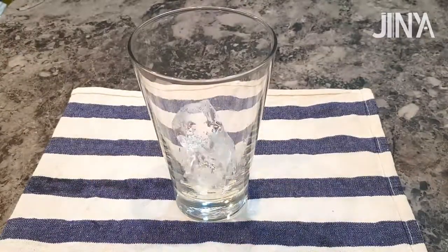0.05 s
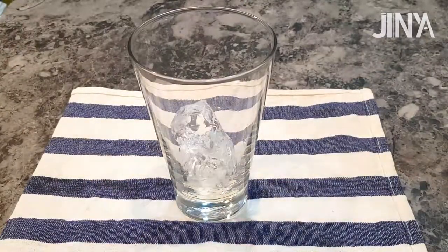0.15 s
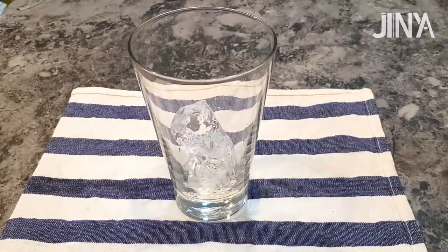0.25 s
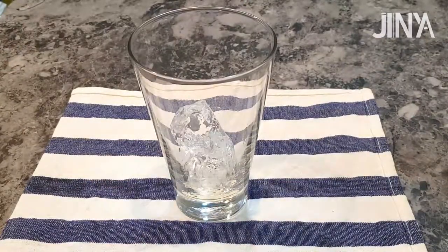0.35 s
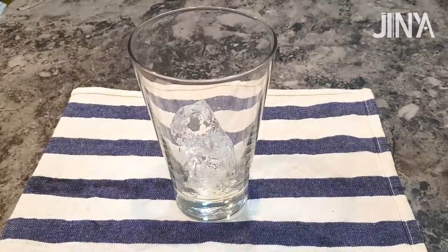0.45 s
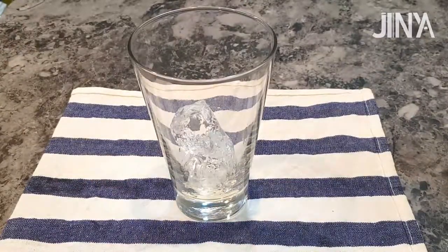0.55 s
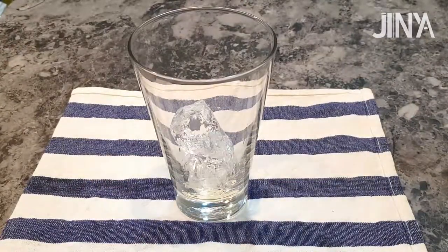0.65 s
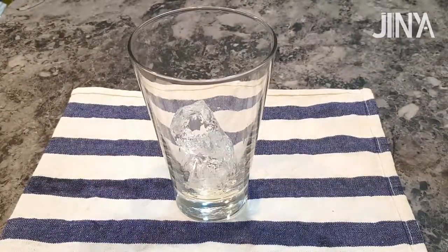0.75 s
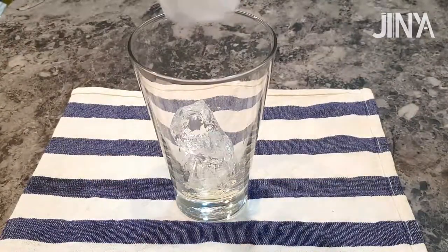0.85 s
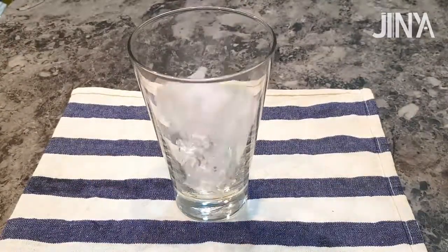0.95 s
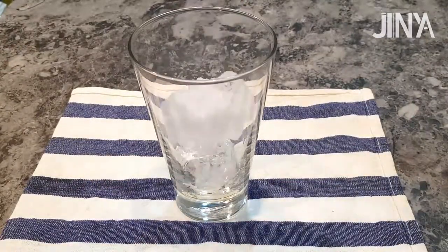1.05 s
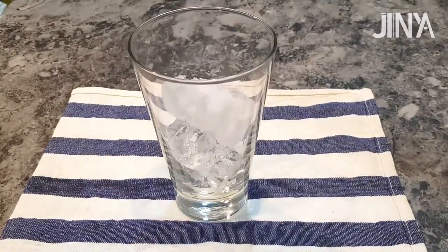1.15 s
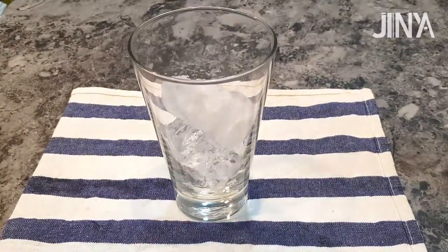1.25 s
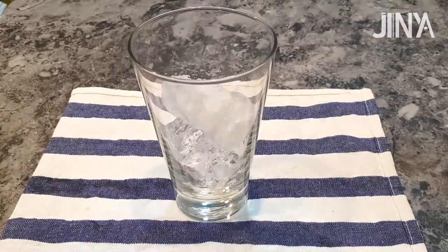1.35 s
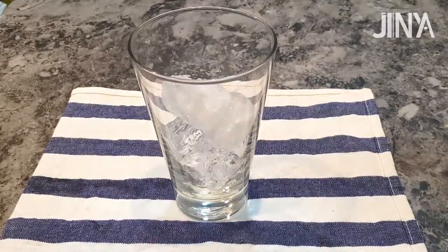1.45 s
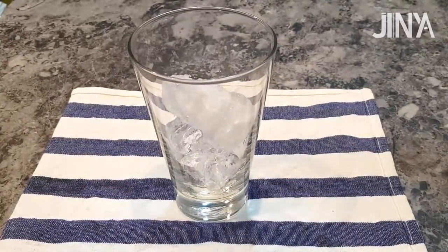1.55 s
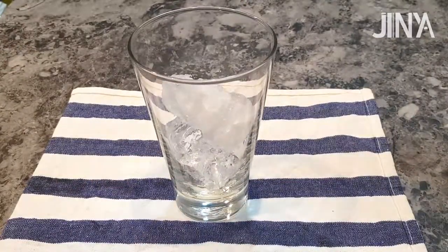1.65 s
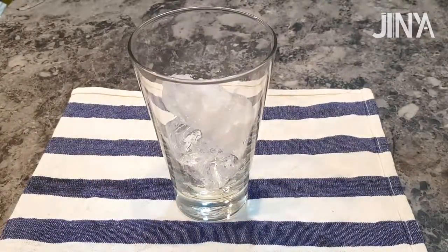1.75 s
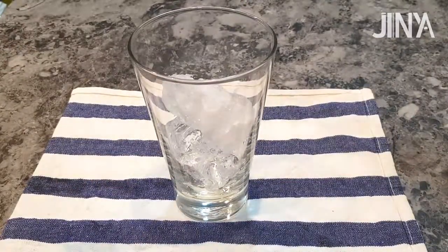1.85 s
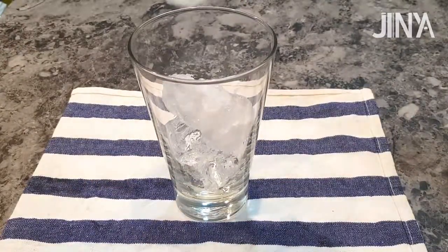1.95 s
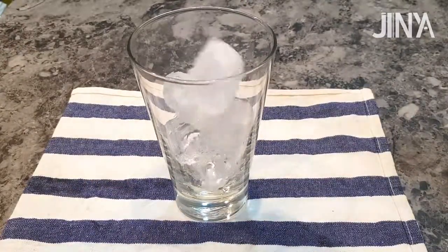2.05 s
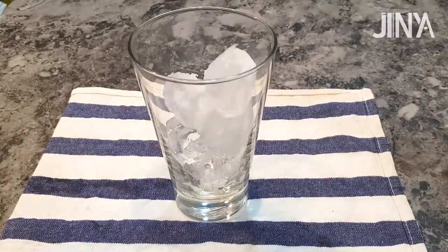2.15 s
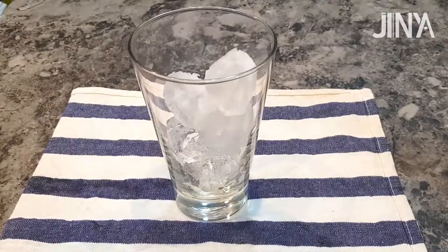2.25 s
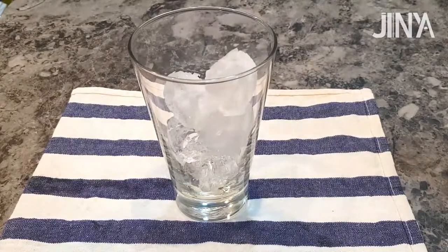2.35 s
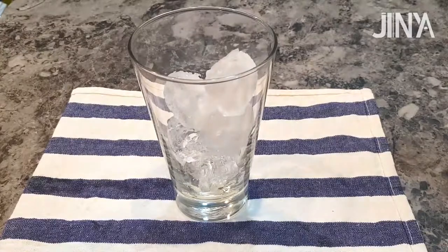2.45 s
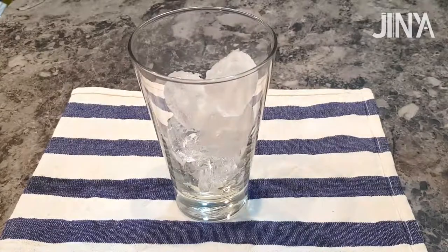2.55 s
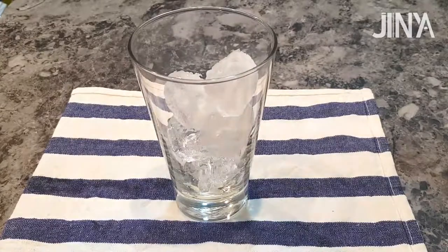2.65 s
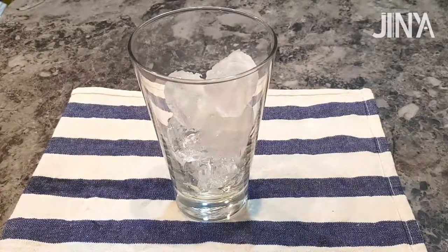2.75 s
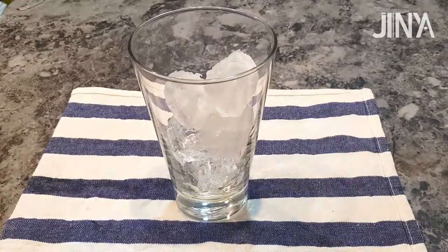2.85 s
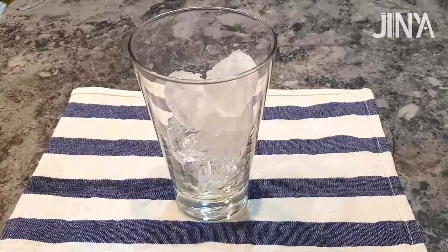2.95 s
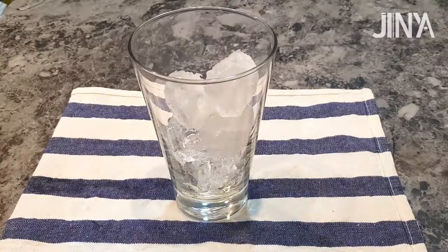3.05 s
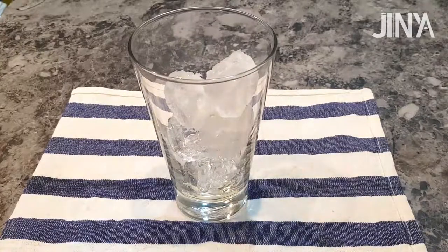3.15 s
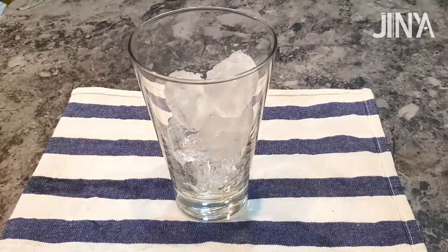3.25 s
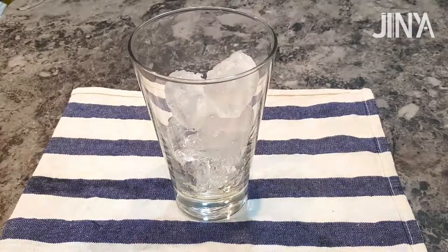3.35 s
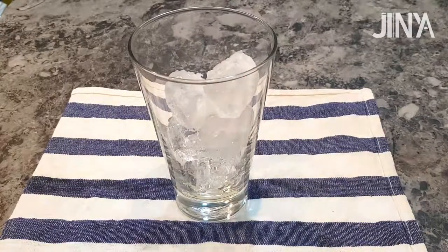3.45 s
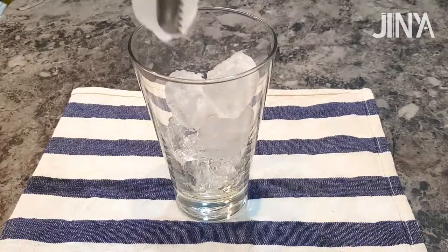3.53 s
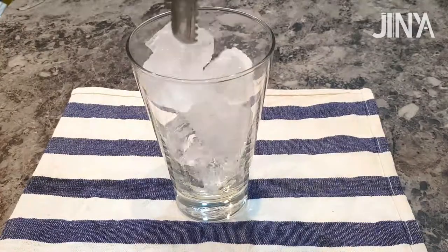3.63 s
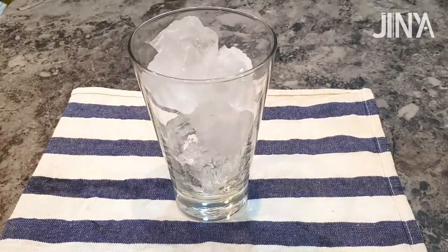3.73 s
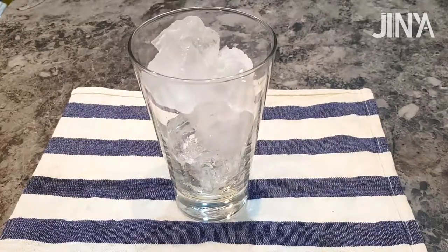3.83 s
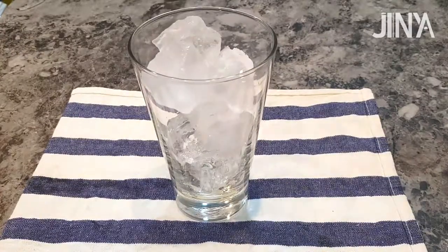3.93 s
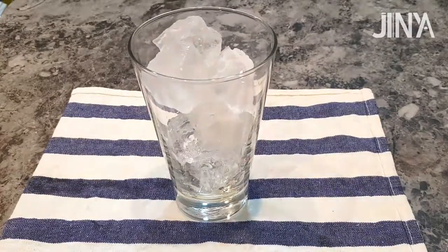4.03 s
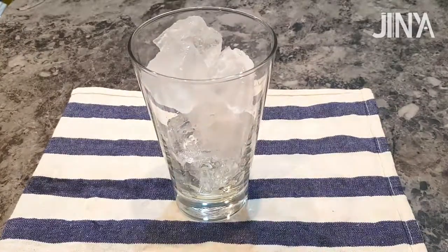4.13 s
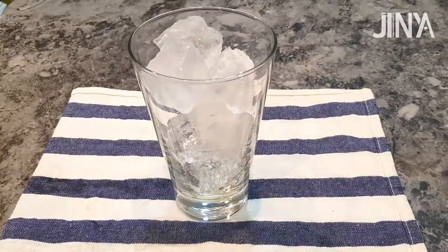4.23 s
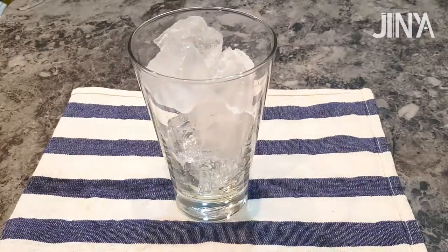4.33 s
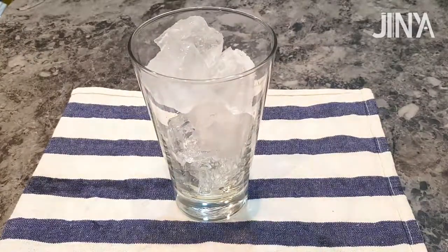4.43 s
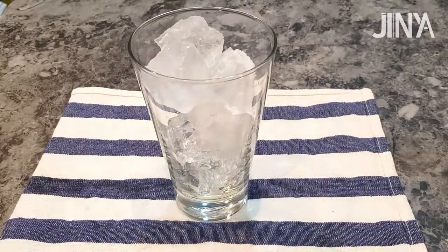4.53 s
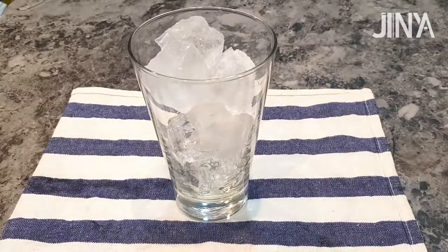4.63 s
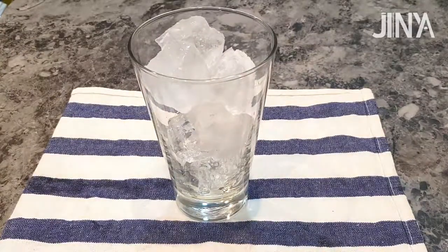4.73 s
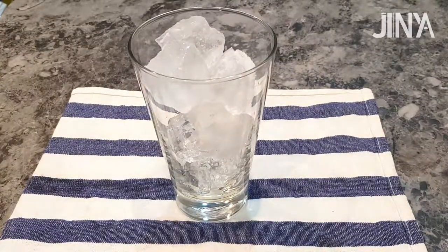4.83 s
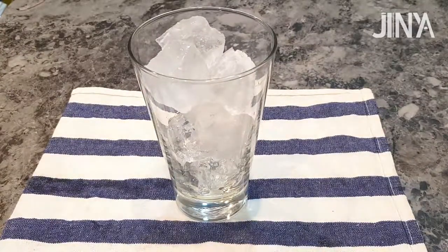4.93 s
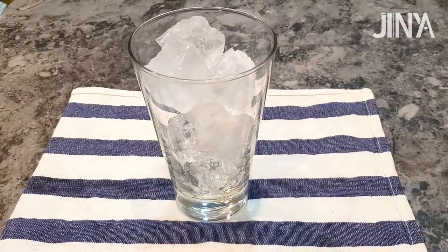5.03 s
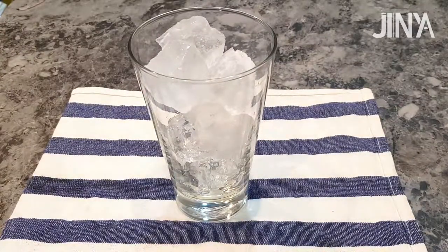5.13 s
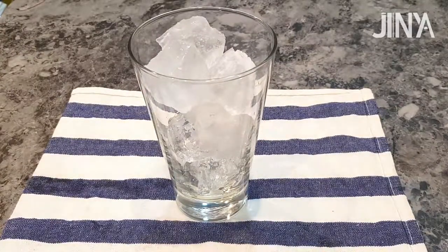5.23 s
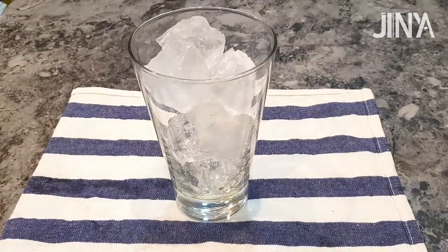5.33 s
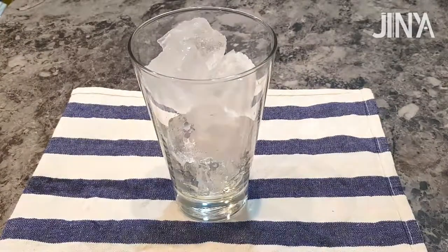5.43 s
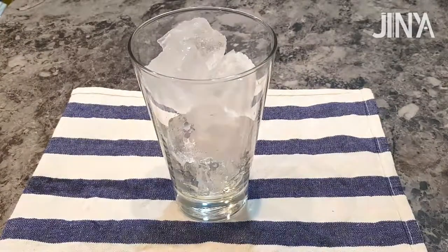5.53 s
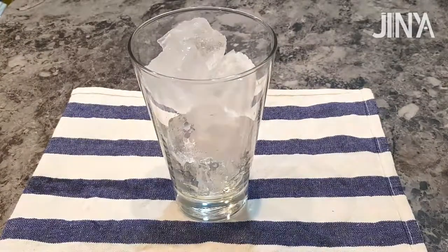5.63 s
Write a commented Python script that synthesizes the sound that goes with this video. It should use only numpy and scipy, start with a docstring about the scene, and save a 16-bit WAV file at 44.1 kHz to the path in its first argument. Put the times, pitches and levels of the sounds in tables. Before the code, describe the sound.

Four ice cubes drop one by one into a tall glass, clinking brightly, while loose cubes clack and slide in a bowl between drops.

```python
"""Four ice cubes drop one after another into a tall glass close by: wall modes ring, the pile knocks, ice cracks.
Between the drops, loose cubes clack, tumble and slide in a bowl farther off to the left, as the next is picked out.
Contacts are noise bursts coloured by resonances; ringing is decaying sines; slides are grainy, swelling hiss.
An appliance hums in the small kitchen; two spaced microphones listen above a cloth-covered counter."""
import sys
import numpy as np
from scipy import signal
from scipy.fft import rfft, irfft, next_fast_len
from scipy.io import wavfile
from scipy.ndimage import uniform_filter1d

SR = 44100
rng = np.random.default_rng(int(sys.argv[2]) if len(sys.argv) > 2 else 0)


def wav_record(signal):
    """Record a signal, one row per channel, as 16-bit PCM in the file named by sys.argv[1]."""
    frames = np.transpose(np.atleast_2d(signal))
    bounded = np.clip(frames, -1, 1)
    # unit amplitude maps onto the largest positive 16-bit level
    quanta = np.round(bounded * 32767).astype(np.int16)
    wavfile.write(sys.argv[1], SR, quanta)


N = 250833

# Cubes hitting the glass wall. Each row: start in seconds, relative strength in dB, height (0 bottom to 3 rim),
# treble tilt in dB per octave, free ringing in seconds before a cube leans on the wall,
# knock on the pile in dB, crack of the cube in dB (levels before the trims of each layer).
STRIKES = [(.0338, -.5, 0, 0, 1, -26, -19), (.9815, -1.5, 1, 0, .04, -25, -17),
           (1.0265, -4, 3, -1, .03, -15, -20), (1.0305, -9, .6, 1.5, .07, -18, -22),
           (1.117, -27, .5, 4, .1, -45, -46), (1.249, -39, .5, 3, .1, -60, -58),
           (2.1148, -7.5, 2, -5, .1, -24, -37), (2.132, .5, 2, .5, .07, -35, -27.5),
           (2.1713, -12, 2.4, 0, .07, -31, -36), (3.657, -11, 3, 0, .02, -22, -30),
           (3.674, -2, 3, -2, .05, -14, -23), (3.6838, -4, 3, 3, .03, -27, -26),
           (3.737, -5, 3, -1, .08, -21, -27)]
# Body of the bowl. Each row: centre in Hz, width in Hz, relative level in dB.
BOWL_BODY = [(430, 284, -7.5), (1234, 240, -0.5), (1700, 400, -5.5), (2317, 540, -5), (3400, 1700, -6.5),
             (4000, 2240, -8.5)]


def amp(db):
    """Decibels to gain."""
    return np.exp(np.asarray(db) * (np.log(10) / 20))


def unit(x):
    """Scale to rms 1."""
    return x / np.sqrt(np.mean(x ** 2) + 1e-20)


def along(points, hz):
    """Read (Hz, value) points on a log frequency axis."""
    f, v = np.transpose(points)
    return np.interp(np.log(hz + 1), np.log(f + 1), v)


def curve(rows):
    """Read (seconds, value) rows at every sample."""
    return np.interp(np.arange(N) / SR, *np.transpose(rows))


def filtered(x, response):
    """Shape x with a complex response of frequency."""
    size = x.shape[-1]
    padded = next_fast_len(size + 2048)
    spectrum = rfft(x, padded) * response(np.fft.rfftfreq(padded, 1 / SR))
    return irfft(spectrum, padded)[..., :size]


def resonances(modes):
    """Causal response of (Hz, width in Hz, dB) band-pass resonances with alternating sign."""
    def response(f):
        total = 0
        for k, (centre, width, db) in enumerate(modes):
            damping = 1j * f * width
            total = total + (-1) ** k * amp(db) * damping / (centre * centre - f * f + damping)
        return total
    return response


def add(track, s, sound):
    """Mix a sound into a track from s seconds on."""
    part = track[..., round(s * SR):][..., :sound.shape[-1]]
    part += sound[..., :part.shape[-1]]


def burst(response, t60, chatter_db, chatter_t60):
    """One contact: a short noise blow plus weaker, separately decaying chatter, coloured by a body."""
    t = np.arange(SR // 8) / SR
    blow = amp(-60 * t / t60)
    chatter = amp(chatter_db - 60 * t / chatter_t60)
    onset = 1 - np.exp(-t / 0.00018)
    sound = filtered(rng.standard_normal(len(t)) * (blow + chatter) * onset, response)
    return sound / np.linalg.norm(sound) * np.sqrt(SR / 200)  # the energy of 5 ms at rms 1


def ring(hz, t60, db, rough, rattle_hz, length=np.inf):
    """Decaying modes, the high ones roughened most by touching ice, with a phase lag per mode between microphones."""
    t = np.arange(round(min(1.3 * t60.max(), length) * SR)) / SR
    knots = rng.standard_normal((len(hz), 2, 400))
    rattle = np.array([np.interp(t * rattle_hz, np.arange(len(a)), a + 1j * b) for a, b in knots])
    rattle /= np.sqrt(2)
    share = np.clip(rough * np.sqrt(hz / hz.max()), 0, 1)[:, None]
    turning = np.exp(2j * np.pi * (hz[:, None] * t + rng.random((len(hz), 1))))
    fade = amp(db[:, None] - 60 * t / t60[:, None]) * (1 - np.exp(-t / 0.00085))
    modes = fade * turning * (np.sqrt(1 - share ** 2) + share * rattle)
    lag = np.exp(-1j * rng.normal(1.2, .2, (len(hz), 1)))  # radians
    return np.array([modes.sum(0).real, (modes * lag).sum(0).real])


def placed(x, lead_ms, pan_db):
    """A source to the left reaches the left microphone earlier and louder."""
    sides = np.array([[.5], [-.5]])

    def paths(hz):
        return amp(sides * pan_db) * np.exp(2j * np.pi * hz * sides * lead_ms / 1000)
    return filtered(x, paths)


def kitchen(x, near_db, wet_db, pan_db):
    """Counter and cupboards scatter the sound in patterns that change as the cubes move; the room adds a tail."""
    # Decay of the room. Each row: frequency in Hz, t60 in seconds.
    room_decay = [(200, 0.83), (2000, 0.34), (7000, 0.32), (15000, 0.06)]
    scatter_s = .08  # a new echo pattern this often
    hop = round(scatter_s * SR)
    source = np.pad(x[0], (hop, 2 * hop))
    echoes = np.zeros((2, N + hop))

    hz, t, z = signal.stft(rng.standard_normal((2, SR // 2)), SR, nperseg=256)
    decay = amp(-60 * t / along(room_decay, hz)[:, None]) * (1 - np.exp(-t / 0.0031))
    tail = signal.istft(z * decay, SR, nperseg=256)[1]

    t = np.arange(SR // 25) / SR
    for start in range(0, N + hop, hop):
        near = rng.standard_normal((2, len(t))) * amp(-60 * t / 0.02) * (t > .0006)
        near /= np.linalg.norm(near[0])
        piece = source[start:start + 2 * hop] * signal.windows.cosine(2 * hop)
        add(echoes, start / SR, signal.fftconvolve(piece[None], near, axes=1))
    late = signal.fftconvolve(x[:1], tail / np.linalg.norm(tail[0]), axes=1)[:, :N]
    near_gain = amp(near_db + pan_db * np.array([[.5], [-.5]]))
    return x + near_gain * echoes[:, hop:] + amp(wet_db) * late


def room_noise():
    """Soft air noise, most alike at both microphones in the bass, and an appliance drone of narrow noise bands."""
    # Course of the background. Each row: time in seconds, level in dB before the trims of air and hum.
    floor_level = [(0.0, -49.5), (0.62, -52.5), (1.19, -48.5), (2.15, -52.5), (3.17, -46.5), (3.55, -45),
                   (4.78, -46), (5.18, -42.5), (5.69, -48.5)]
    # Colour of the air noise. Each row: frequency in Hz, relative level in dB per Hz.
    air_colour = [(13, -45.5), (22, -16), (70, -11), (112, -4.5), (140, -6.5), (184, -2), (366, -17),
                  (469, -15), (618, -22.5), (837, -22.5), (1670, -28), (2260, -25.5), (3060, -38.5),
                  (4890, -36.5), (16000, -55)]
    # Likeness of the two microphones. Each row: frequency in Hz, likeness from 0 to 1.
    likeness = [(60, 0.94), (180, 0.99), (550, 0.7), (1650, 0.12), (4970, 0.13), (15000, 0.09)]
    # Appliance drone. Each row: centre in Hz, resonance width in Hz, relative level in dB before sharpening.
    drone = [(111.8, 4.9, 8.5), (178.2, 6.5, 0), (235, 8.3, -9)]

    def mid_side(hz):
        turn = np.arccos(np.clip(along(likeness, hz), 0, 1)) / 2
        return amp(along(air_colour, hz)) * [np.cos(turn), np.sin(turn)]

    def sharpened(hz):
        return abs(resonances(drone)(hz)) ** 1.2

    mid, side = filtered(rng.standard_normal((2, N)), mid_side)
    air = unit(np.array([mid + side, mid - side]))
    hum = unit(filtered(rng.standard_normal(N), sharpened))
    return amp(curve(floor_level)) * (amp(-0.5) * air + amp(-3) * hum) * amp([[.7], [-.7]])


def bowl_handling():
    """The nudged bowl thuds on the counter as noise bursts; a utensil clinks on it with decaying modes."""
    # Nudges of the bowl. Each row: start in seconds, level in dB before a trim.
    nudges = [(5.176, -25), (5.189, -27), (5.224, -47), (5.296, -30.5)]
    # Counter body. Each row: centre in Hz, width in Hz, relative level in dB.
    counter = [(266, 62, 2.5), (512, 70, 0), (885, 1000, -13.5)]
    # Clinks of the utensil. Each row: start in seconds, relative level in dB.
    clinks = [(5.223, 2)]
    # Utensil modes. Each row: frequency in Hz, t60 in seconds, relative level in dB.
    utensil = [(915, .14, -36), (1655, .13, -26), (2519, .1, -38), (3534, .09, -35), (4190, .06, -40),
               (4780, .06, -41), (6040, .06, -40)]
    out = np.zeros((2, N))
    for s, db in nudges:
        thud = burst(resonances(counter), t60=0.01, chatter_db=-14.5, chatter_t60=0.32)
        add(out, s, amp(db - 1.5) * thud)
    hz, t60, mode_db = np.transpose(utensil)
    for s, db in clinks:
        add(out, s, ring(hz, t60, db + mode_db, rough=0.14, rattle_hz=190))
        knock = burst(resonances(BOWL_BODY), t60=.02, chatter_db=-1.5, chatter_t60=.12)
        add(out, s, amp(db - 29.0) * knock)
    return out


def slides(grain_db):
    """Frosty faces rub: a hiss of tiny slips swells and dies away, each slide with its own brightness."""
    # Cubes sliding over each other. Each row: peak in seconds, relative level in dB,
    # seconds per 20 dB of rise, treble tilt in dB per octave.
    slide_rows = [(.575, -46, 0.049, -1), (1.552, -40, .05, -2), (2.8, -45.5, 0.12, -1),
                  (2.92, -53, 0.075, 8), (4.447, -39, 0.067, -1), (4.602, -35, 0.023, -1.5),
                  (4.714, -36, .025, 4), (4.791, -28.5, 0.058, 1.5), (5.049, -39, 0.0068, 1),
                  (5.259, -32, 0.012, 2), (5.296, -33.5, 0.08, .5), (5.395, -42, 0.014, 0.5),
                  (5.476, -41.5, .01, -1.5)]
    # Colour of the rubbing. Each row: frequency in Hz, relative level in dB per Hz.
    rub_colour = [(240, -41), (400, -11), (777, -3), (1090, 3.5), (1530, -5), (2020, 4.5), (2550, -6.5),
                  (3120, -4), (6240, -16), (12700, -18), (16000, -20.5)]
    slide_t60 = .29  # seconds, alike for every slide
    out = np.zeros(N)
    t = np.arange(-SR // 4, SR // 2) / SR  # 0 at the peak
    for s, db, rise, tilt in slide_rows:
        slow = unit(uniform_filter1d(rng.standard_normal(len(t)), size=90))
        grains = amp(grain_db * slow) * rng.standard_normal(len(t))
        hiss = unit(filtered(grains, lambda hz: amp(along(rub_colour, hz) + tilt * np.log2(hz + 1))))
        swell_db = np.where(t < 0, 20 * t / rise, -60 * t / slide_t60)
        add(out, s + t[0], hiss * amp(db + swell_db))
    return out


def brittle(patchy_db):
    """The colour of one crack: every contact has its own random bright and dull bands."""
    # Brittle contact. Each row: frequency in Hz, relative level in dB per Hz.
    crack_colour = [(500, -14.5), (2000, -6.5), (4000, -9.5), (7000, -7.5), (9500, -12), (13000, -3),
                    (16000, -3.5)]
    bands = patchy_db * rng.standard_normal(32)
    band_hz = np.linspace(0, SR / 2, len(bands))
    return lambda hz: amp(along(crack_colour, hz) + np.interp(hz, band_hz, bands))


def clack(knock_db, crack_db, pitch):
    """Ice on ice: a brittle crack, and a knock at the pitch of the gap between the cubes, coloured by the bowl."""
    def body(hz):
        gap = resonances([(pitch, .35 * pitch, 0)])(hz)
        return resonances(BOWL_BODY)(hz) * (0.22 + gap)

    cube = brittle(patchy_db=5)
    knock = burst(body, t60=0.0016, chatter_db=-33.5, chatter_t60=0.12)
    crack = burst(cube, t60=0.0057, chatter_db=-20, chatter_t60=0.096)
    return amp(knock_db) * knock + amp(crack_db) * crack


def loose_cubes():
    """Single loud clacks, and tumbles whose small contacts have random moments, sizes and pitches."""
    # Loudest clacks in the bowl. Each row: start in seconds, knock in dB and crack in dB before their trims,
    # knock pitch in Hz.
    loud_clacks = [(0.418, -38, -41, 1980), (0.53, -29, -37, 1020), (0.564, -30.5, -34.5, 2130),
                   (0.582, -26.5, -44, 855), (0.597, -30, -34.5, 1900), (0.674, -13.5, -56, 1800),
                   (0.7, -28, -47, 2120), (0.733, -48, -37, 2120), (0.749, -25, -38, 2100),
                   (0.781, -25.5, -52, 1930), (1.455, -27, -35, 2120), (1.464, -29, -34.5, 2280),
                   (1.491, -39, -32, 1268), (1.503, -25, -18, 2340), (1.532, -12.5, -41, 2200),
                   (1.554, -24.5, -22.5, 2243), (1.614, -25.5, -32.5, 2130), (1.633, -29, -36, 950),
                   (1.748, -28, -67, 2130), (1.785, -29, -60, 2620), (2.657, -39, -31, 2200),
                   (2.667, -22.5, -46.5, 1220), (2.776, -24.5, -53, 2560), (2.831, -36, -38, 2340),
                   (2.863, -24, -41, 1590), (2.893, -30.5, -48, 1227), (3.016, -23.5, -44, 3550),
                   (3.027, -20, -35, 2200), (4.415, -17.5, -36.5, 2166), (4.444, -31, -29, 2450),
                   (4.603, -22.5, -35, 1140), (4.718, -25, -35, 2220), (5.175, -30.5, -36, 1630)]
    # The heap tumbles in runs. Each row: start in seconds, length in seconds, typical knock in dB,
    # typical crack in dB.
    tumbles = [(0.397, 0.027, -44, -43.5), (0.534, 0.066, -44, -53), (.68, 0.066, -42, -50),
               (1.488, 0.079, -37, -44), (1.579, 0.072, -40, -70), (1.71, 0.052, -46.5, -67),
               (2.681, .07, -46.5, -57), (2.751, 0.18, -43, -49.5), (2.936, 0.085, -46.5, -66),
               (3.016, 0.048, -39.5, -56), (4.399, 0.055, -41, -53)]
    knock_trim_db, crack_trim_db = -8.5, -4  # loud clacks only
    contacts_per_s, scatter_db = 110, 3
    typical_hz, spread_octaves = 1960, 0.77
    out = np.zeros(N)
    for s, knock_db, crack_db, pitch in loud_clacks:
        add(out, s, clack(knock_db + knock_trim_db, crack_db + crack_trim_db, pitch))
    for start, length, knock_db, crack_db in tumbles:
        count = max(1, round(length * contacts_per_s))
        for k, (knock, crack, octaves) in enumerate(rng.standard_normal((count, 3))):
            s = start + length * (k + rng.random()) / count
            pitch = typical_hz * 2 ** (spread_octaves * octaves)
            add(out, s, clack(knock_db + scatter_db * knock, crack_db + scatter_db * crack, pitch))
    return out


def ice_pile():
    """Every strike and every settling cube cracks, knocks the pile and sounds the air in the glass."""
    # Pile of ice. Each row: centre in Hz, width in Hz, relative level in dB.
    pile_body = [(323, 370, -18), (1240, 350, -12), (1721, 110, 6), (2440, 435, -2), (2750, 980, -8.5),
                 (4460, 1100, -17)]
    # Air in the glass, split by the cubes. Each row: centre in Hz, width in Hz, relative level in dB.
    hollow_air = [(806, 220, 2.5), (876, 116, 8)]
    # A cube tips over on the pile. Each row: start in seconds, knock in dB before a trim, hollow air note in dB.
    settles = [(.0265, -22.5, -52), (.061, -23, -39), (.1271, -28, -54.5), (.1396, -33, -40),
               (1.102, -30.5, -31), (1.1276, -31, -36.5), (2.211, -40.5, -43.5)]
    strike_air_db, air_db_per_s = -11.5, -1.84  # air note over the knock; it fades as the glass fills
    settle_crack_db = -14  # over the knock
    out = np.zeros(N)
    contacts = []
    for s, *_, knock_db, crack_db in STRIKES:
        contacts.append((s, knock_db, crack_db, knock_db + strike_air_db + air_db_per_s * s))
    for s, knock_db, air_db in settles:
        contacts.append((s, knock_db, knock_db + settle_crack_db, air_db))
    for s, knock_db, crack_db, air_db in contacts:
        cube = brittle(patchy_db=5)
        knock = burst(resonances(pile_body), t60=0.0055, chatter_db=-17, chatter_t60=0.13)
        crack = burst(cube, t60=0.0057, chatter_db=-33.0, chatter_t60=0.11)
        air = burst(resonances(hollow_air), t60=0.012, chatter_db=-20.5, chatter_t60=0.082)
        add(out, s, amp(knock_db - 1.5) * knock)
        add(out, s, amp(crack_db + 1.0) * crack)
        add(out, s, amp(air_db) * air)
    return placed(out, lead_ms=0.11, pan_db=2.0)


def cube_ring(count):
    """Each striking cube rings briefly with its own random cluster of close modes."""
    low_hz, high_hz, t60_s = 3010, 6490, .07
    over_crack_db = -17  # typical level of a mode
    out = np.zeros((2, N))
    for s, *_, crack_db in STRIKES:
        place = (np.arange(count) + rng.random(count)) / count
        hz = low_hz * (high_hz / low_hz) ** place
        mode_db = crack_db + over_crack_db + 2 * rng.standard_normal(count)
        add(out, s, ring(hz, np.full(count, t60_s), mode_db, rough=.6, rattle_hz=200))
    return out


def glass_wall():
    """The height of a blow sets the level of each wall mode; a cube coming to rest on the wall chokes them."""
    # Wall modes. Each row: frequency in Hz, t60 in seconds, then relative level in dB
    # when struck at the bottom, low, high and at the rim.
    wall_modes = [(1691, .46, -16, -17.5, -44, -38), (1752, .13, -40, -36, -35, -25),
                  (2461, .38, -22.5, -36, -36, -29), (3782, .22, -39, -32, -53, -32),
                  (4540, .12, -38, -44, -52, -42), (5620, .19, -44, -34, -28.5, -32),
                  (6810, .14, -23, -34, -42, -38), (6982, .15, -16.5, -34, -50, -44),
                  (7900, .11, -44, -42, -48, -35), (8075, .13, -42, -27, -43, -36),
                  (10140, .1, -52, -33, -32, -31), (10618, .1, -44, -19, -39, -30),
                  (11210, .09, -24, -36, -50, -37), (11965, .07, -7, -22, -44, -42),
                  (12790, .1, -28, -29, -36, -31), (13100, .11, -16, -26, -39, -32),
                  (13750, .07, -32, -28, -42, -32), (15320, .09, -55, -34, -46, -38)]
    out = np.zeros((2, N))
    hz, t60, *by_height = np.transpose(wall_modes)
    for s, db, height, tilt, free, *_ in STRIKES:
        shape_db = np.array([np.interp(height, np.arange(len(mode)), mode) for mode in np.transpose(by_height)])
        mode_db = db + shape_db + tilt * np.log2(hz / 5000)
        sound = ring(hz, t60, mode_db, rough=.6, rattle_hz=200, length=free + .06)
        leaning = np.maximum(np.arange(sound.shape[1]) / SR - free, 0)  # seconds
        add(out, s, sound * amp(-60 * leaning / 0.04))
    return out * amp([[1.5], [-3]])


def scene():
    """The glass stands close; the bowl is farther off to the left."""
    room = room_noise()
    wall = kitchen(glass_wall() + cube_ring(count=9), near_db=-20, wet_db=-12.5, pan_db=0)
    pile = kitchen(ice_pile(), near_db=-1.5, wet_db=-13.5, pan_db=2.0)
    handling = placed(slides(grain_db=4.0), lead_ms=.44, pan_db=6) + bowl_handling()
    rattle = placed(loose_cubes(), lead_ms=.5, pan_db=9)
    bowl = kitchen(handling, near_db=-2, wet_db=-13, pan_db=1.5)
    bowl += kitchen(rattle, near_db=-4, wet_db=-16.5, pan_db=7)
    return wall + pile + amp(-2.5) * bowl + room


def record(dry):
    """The sound cuts out briefly; the microphones colour it and a steep low-pass ends the treble."""
    # Brief dropout. Each row: time in seconds, gain in dB.
    dropout = [(5.416, 1), (5.421, -37), (5.448, -39), (5.460, 2.5)]
    # Colour of the microphones above the counter. Each row: frequency in Hz, gain in dB.
    mic_colour = [(35, -0.5), (100, -3.5), (480, 1.5), (640, 2), (950, -0.5), (1500, -3), (15000, 4)]
    top_hz = 15850

    def microphones(hz):
        return amp(along(mic_colour, hz)) / (1 + (hz / top_hz) ** 120)
    return filtered(dry * amp(curve(dropout)), microphones)


dry = scene()
out = record(dry)
wav_record(out)
```